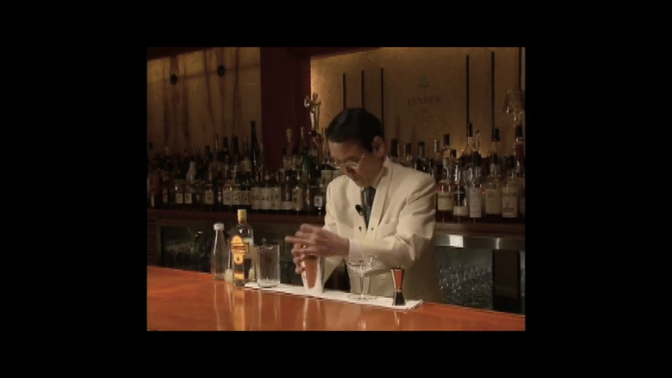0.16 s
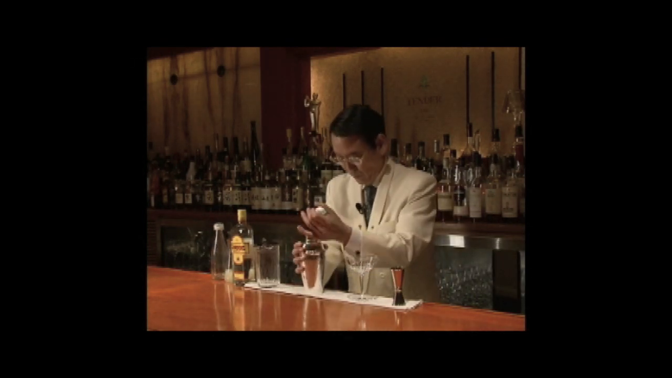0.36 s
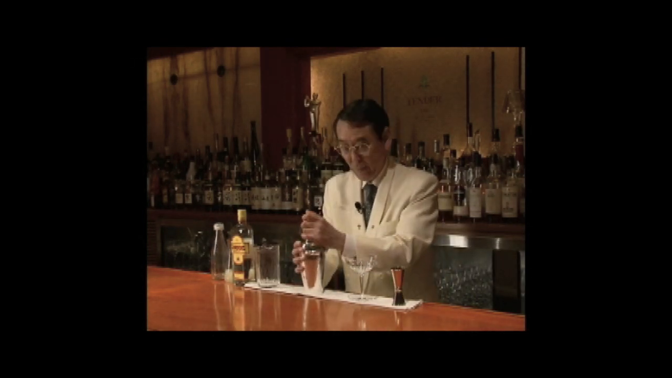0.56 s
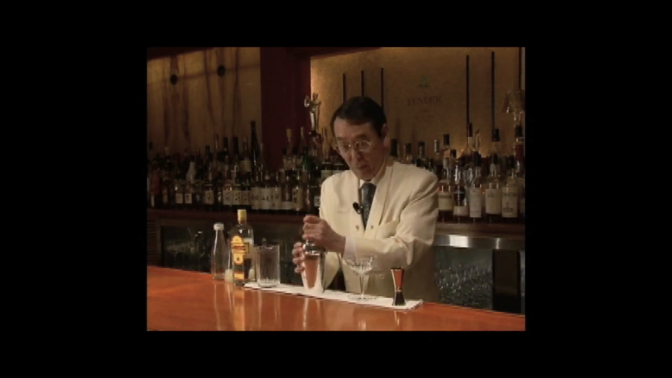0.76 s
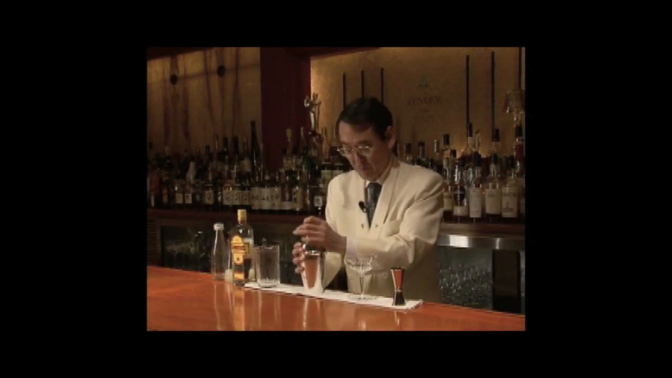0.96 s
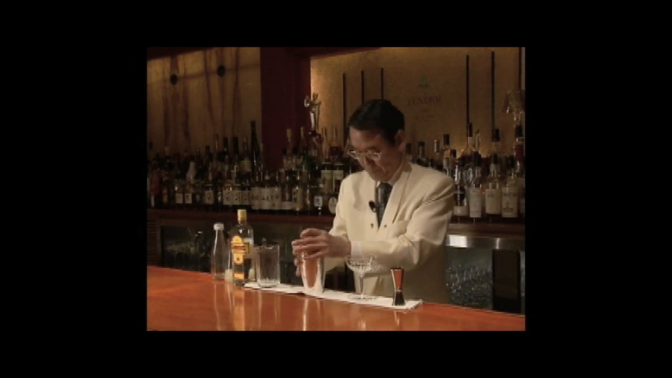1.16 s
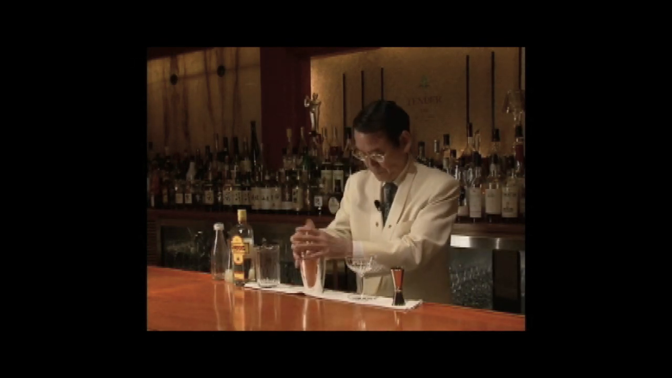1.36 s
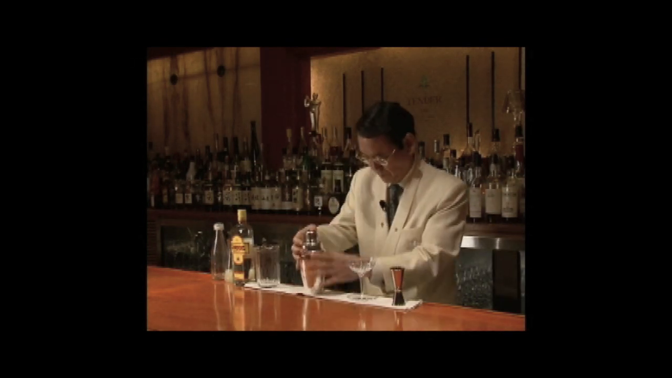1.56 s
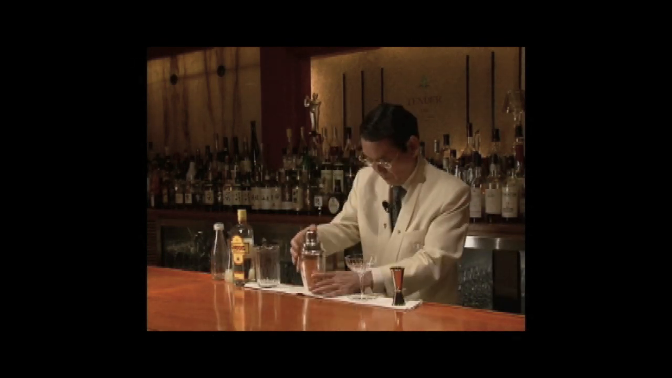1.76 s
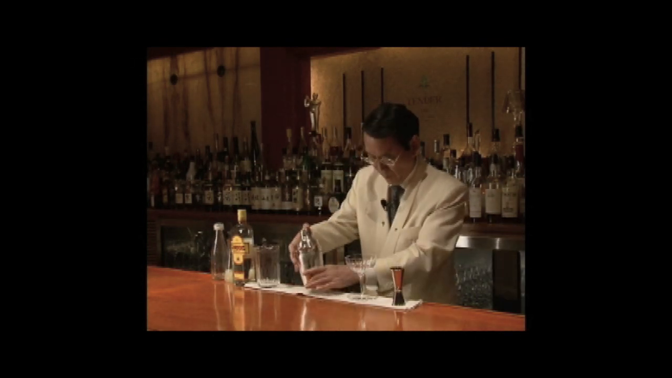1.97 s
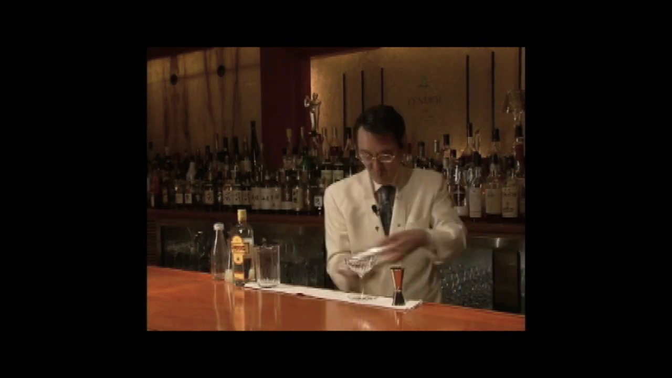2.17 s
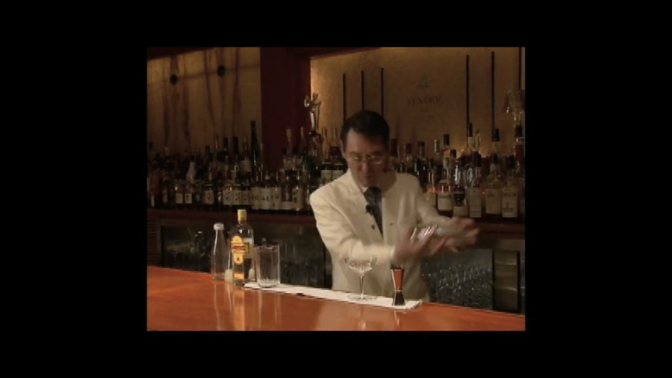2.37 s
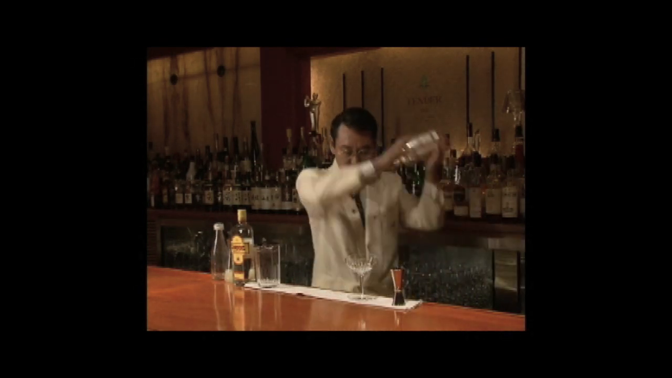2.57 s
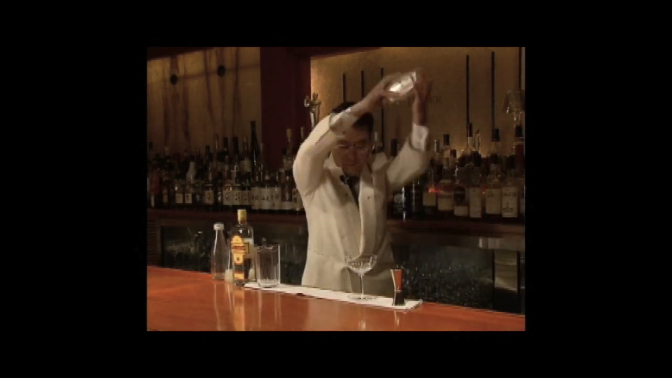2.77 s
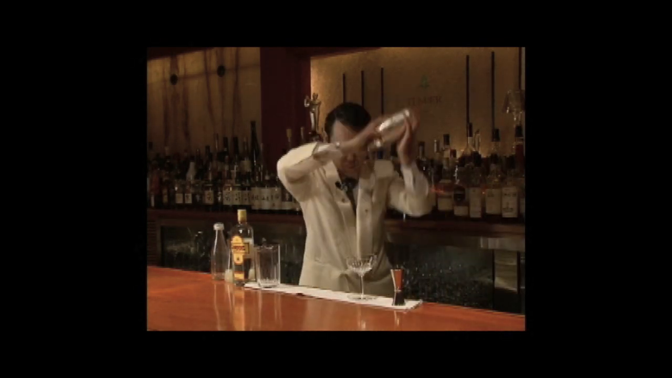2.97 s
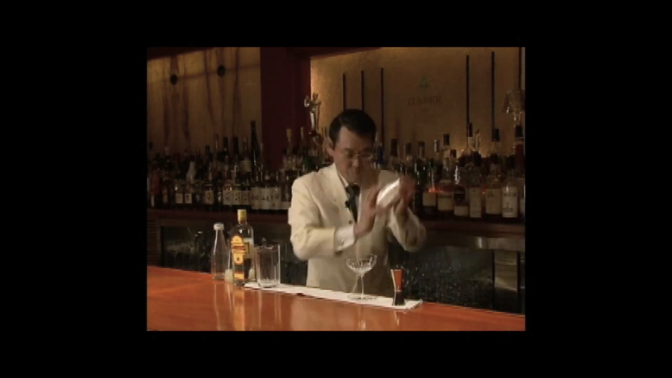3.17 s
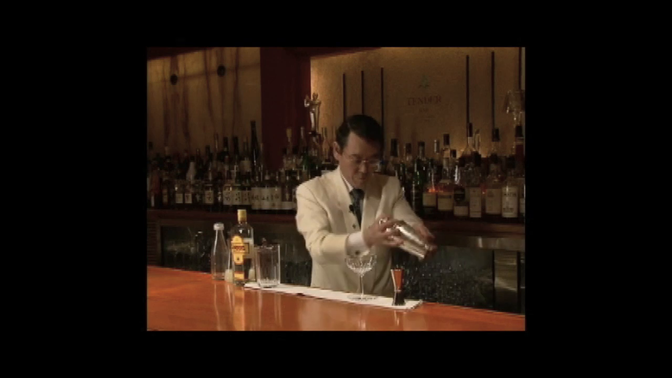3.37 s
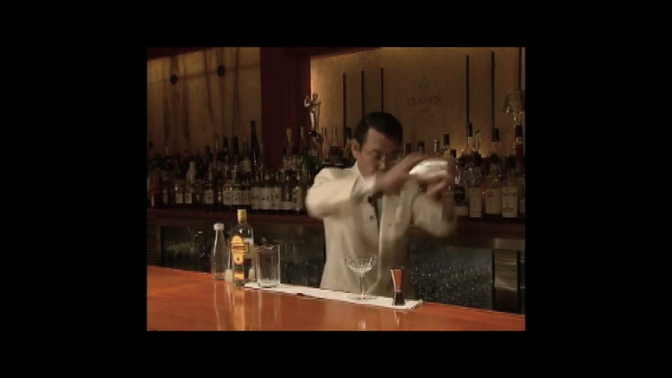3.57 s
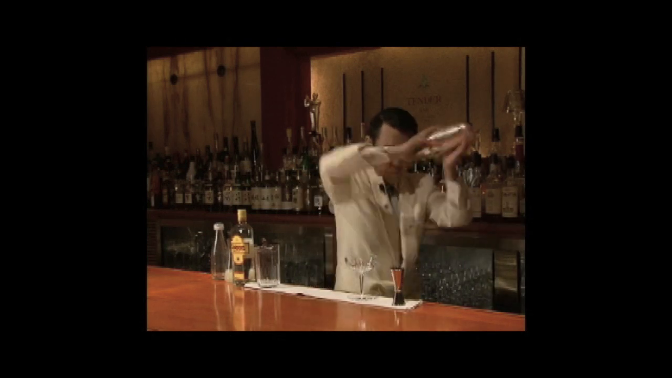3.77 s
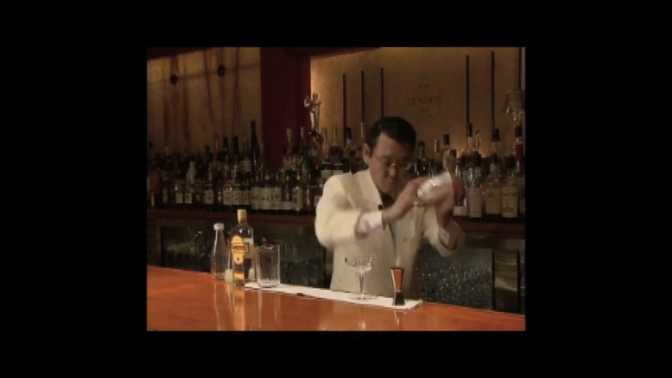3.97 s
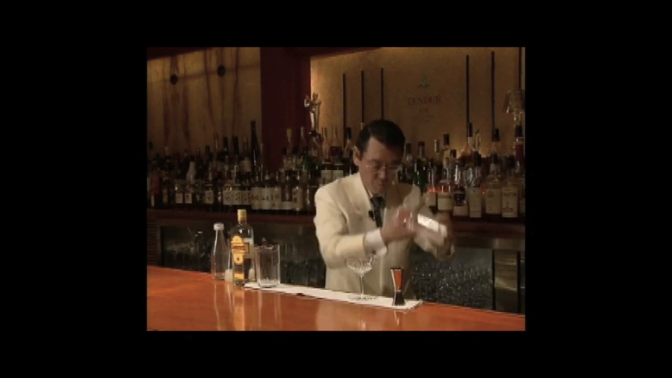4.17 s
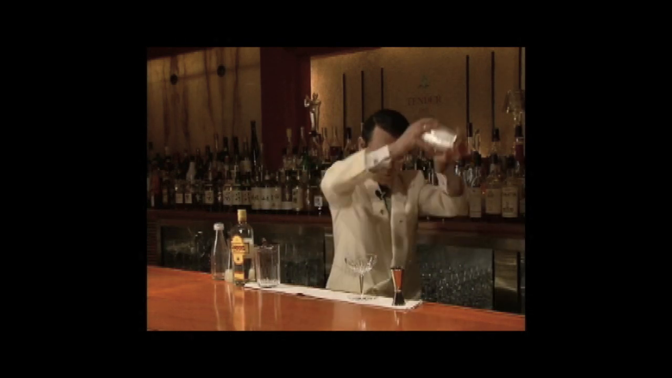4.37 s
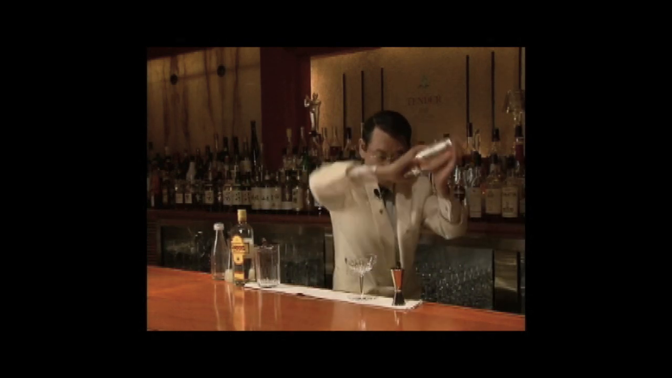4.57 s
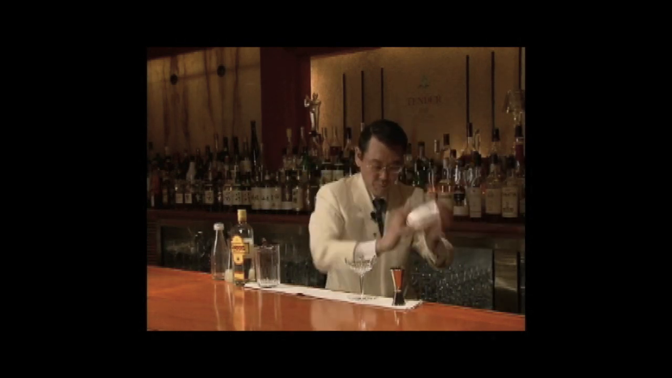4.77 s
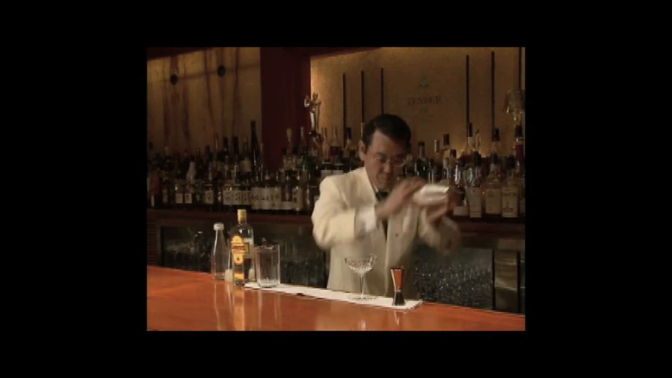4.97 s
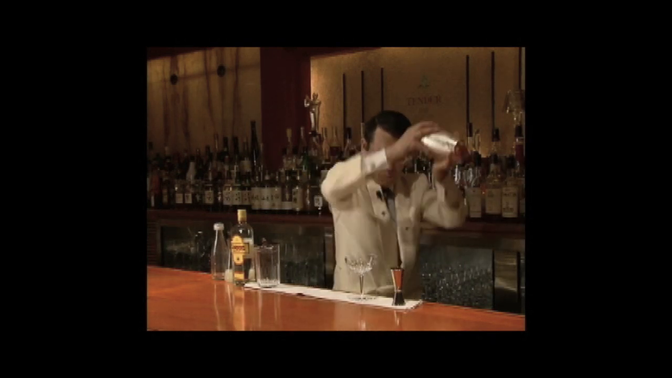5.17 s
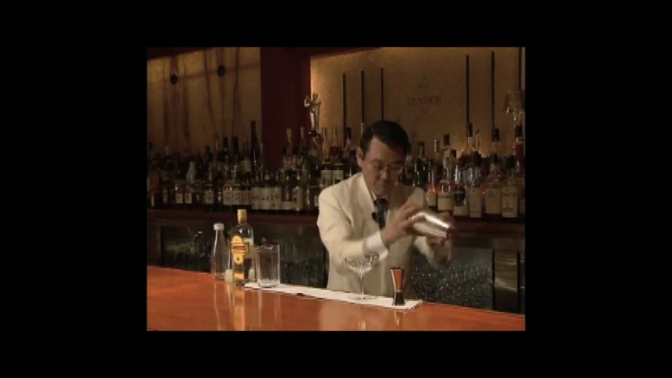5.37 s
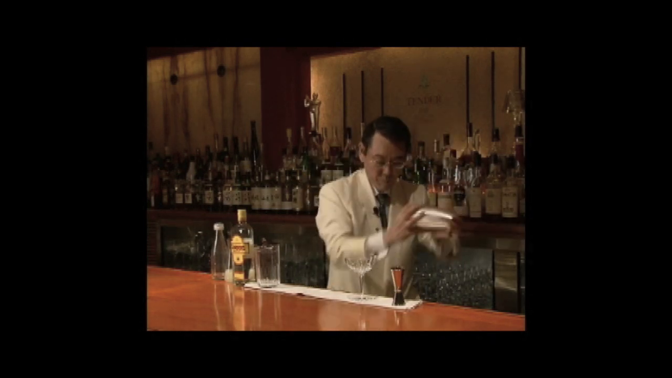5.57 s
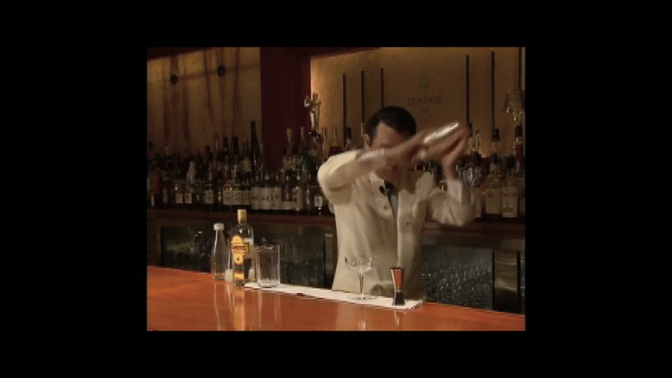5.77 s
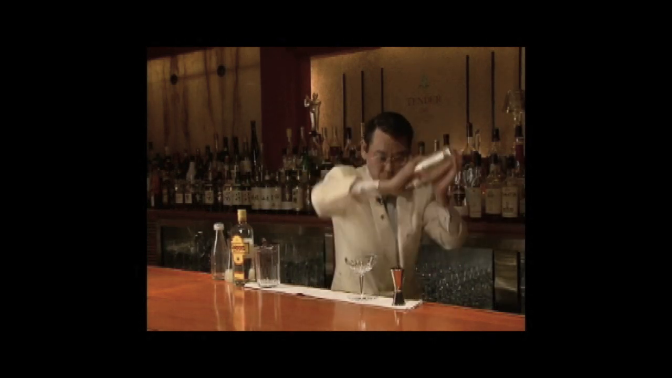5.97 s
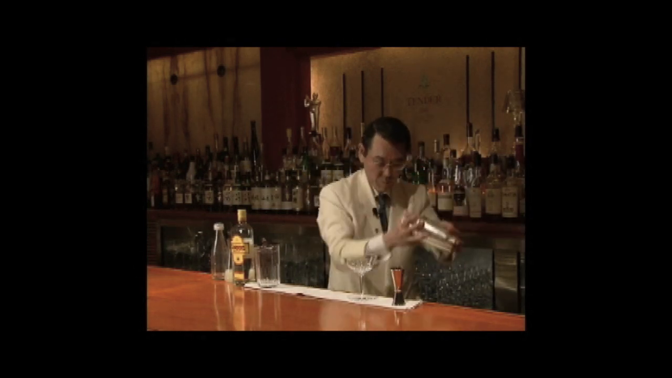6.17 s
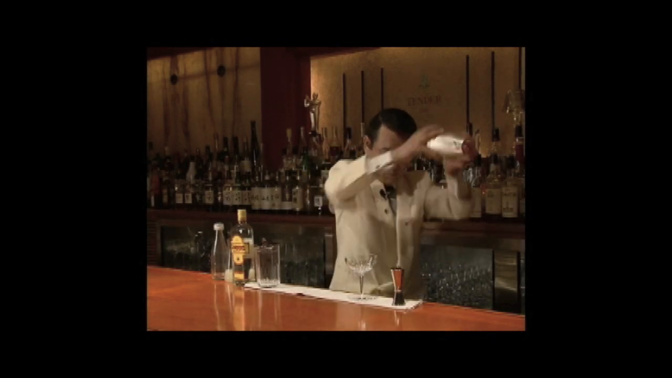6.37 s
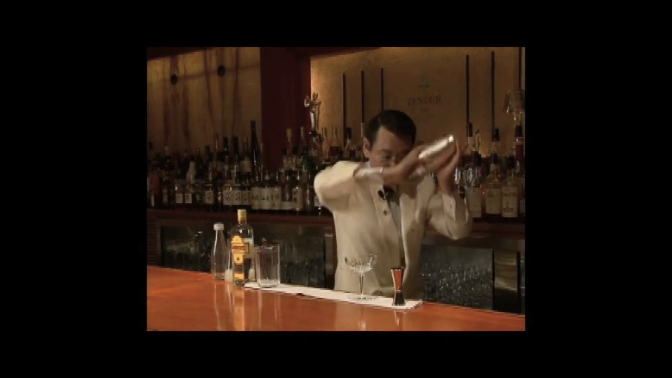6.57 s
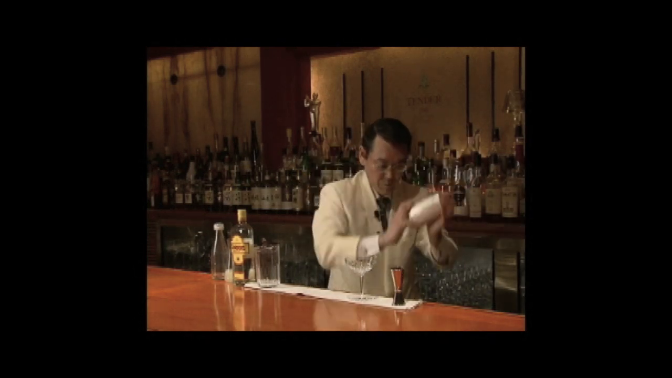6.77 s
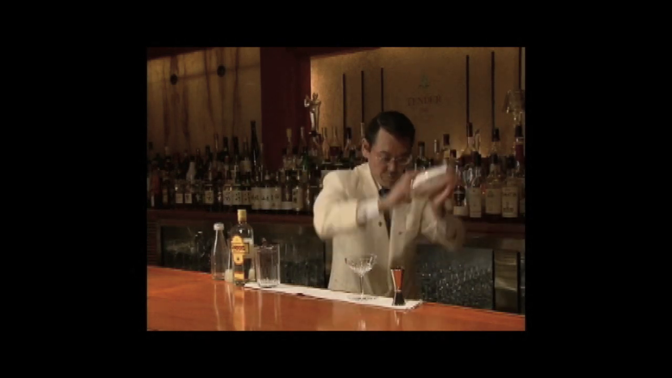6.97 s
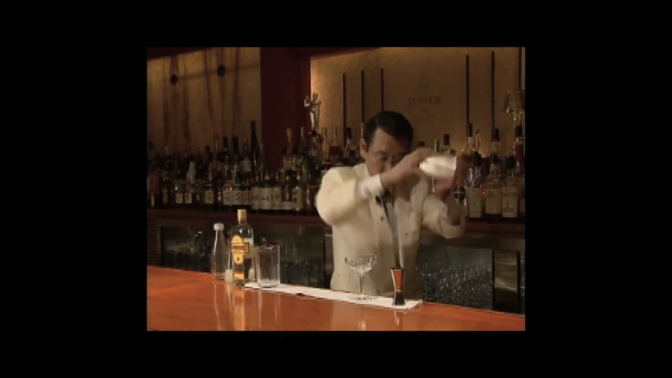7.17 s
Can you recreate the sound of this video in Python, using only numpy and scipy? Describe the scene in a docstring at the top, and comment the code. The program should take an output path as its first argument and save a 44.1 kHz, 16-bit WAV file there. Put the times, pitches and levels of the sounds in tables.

```python
"""A cooler hums under faint hiss in a quiet bar: wavering sines and shaped noise; sleeves rustle as shaped noise.
From 0.2 s a steel shaker is capped and tapped on a wooden counter: short rings of shell, lid, cap and wood.
From 2.2 s ice is shaken hard inside it, about nine strokes a second: big cubes ring the damped shell one by one,
while chips and drink rattle as a dense random train of small blows that swells and settles with each stroke.
Reflections follow the shaker, the sound has a slight random width, and gain control ducks it all on loud blows.
"""
import sys
import numpy as np
from scipy import signal
from scipy.fft import rfft, irfft, next_fast_len
from scipy.io import wavfile
from scipy.ndimage import uniform_filter1d

SR = 44100
rng = np.random.default_rng(int(sys.argv[2]) if len(sys.argv) > 2 else 0)


def to_wav(sig):
    """Store sig (one row per channel, or 1-D mono) as 16-bit WAV at the path in sys.argv[1].

    Samples outside -1..1 are clipped; the rate is SR.
    """
    pcm = np.clip(np.atleast_2d(sig), -1, 1) * 32767
    pcm = np.round(pcm).astype(np.int16)
    wavfile.write(sys.argv[1], SR, pcm.T)  # frames by channels


N = 318843  # length in samples


def amp(db):
    """Turns decibels into a plain gain."""
    return 10 ** (np.asarray(db) / 20)


def evened(x):
    """Scales a sound to an average (rms) level of 1."""
    return x / np.sqrt(np.mean(x ** 2) + 1e-20)


def noise():
    """Plain random hiss as long as the scene."""
    return rng.standard_normal(N)


def slow_noise(width):
    """Random wavering of rms 1: noise averaged twice over `width` samples."""
    return evened(uniform_filter1d(uniform_filter1d(noise(), width), width))


def add(mix, start_s, sound):
    """Mixes a sound in at its start time, cutting off what runs past the end."""
    part = mix[round(start_s * SR):][:len(sound)]
    part += sound[:len(part)]


def coloured(x, points):
    """Filters a sound by a curve of (pitch_hz, level_db) points."""
    size = next_fast_len(len(x))
    point_hz, point_db = np.transpose(points)
    hz = np.fft.rfftfreq(size, 1 / SR)
    gain = amp(np.interp(np.log(hz + 1), np.log(point_hz + 1), point_db))
    return irfft(rfft(x, size) * gain, size)[:len(x)]


def along(curve):
    """Gain through (time_s, level_db) points: near silence before the first, the last one held."""
    time_s, level_db = np.transpose(curve)
    return amp(np.interp(np.arange(N) / SR, time_s, level_db, left=-120, right=level_db[-1]))


# Spectrum of the hiss: pitch_hz, level_db
AIR_SPECTRUM = [(18, -39), (30, -23), (50, -11.5), (100, -11), (200, -5.5), (330, -7.5), (420, -4.5),
                (600, -8), (1200, -17.5), (1850, -24.5), (4400, -32.5), (6500, -30.5), (15500, -53)]


def ventilation():
    """Moving air: steady noise, strongest in the bass."""
    return amp(-47.5) * evened(coloured(noise(), AIR_SPECTRUM))


# Tones of the cooler: pitch_hz, level_db (rms, before wavering)
HUM_TONES = [(139.5, -63.5), (190, -57.5), (217, -59.5), (245.3, -52.5), (304, -71), (355, -62),
             (390, -55.5), (409, -60.5), (463.5, -61), (630, -65), (665, -64)]


def cooler():
    """A machine hum: steady pitches whose levels each waver slowly by about 1.1 dB."""
    t = np.arange(N) / SR
    hum = np.zeros(N)
    for pitch_hz, level_db in HUM_TONES:
        wavering = amp(level_db + 1.1 * slow_noise(3000))
        hum += np.sqrt(2) * wavering * np.sin(2 * np.pi * (pitch_hz * t + rng.random()))
    return hum


# Loudness of the sleeves: time_s, level_db
RUSTLE_LEVEL = [(0.0, -64), (0.3, -61.5), (0.8, -59.5), (1.16, -67), (1.45, -60), (1.7, -77), (1.92, -61.5),
                (2.2, -53)]
# Spectrum of rubbing cloth: pitch_hz, level_db
CLOTH_SPECTRUM = [(880, -35), (1500, -4), (2270, 0), (3370, -9), (3600, -7), (5840, -6), (15000, -24)]


def sleeves():
    """Rubbing cloth: shaped noise that follows the level points and stops at the last one."""
    moving = np.arange(N) / SR < RUSTLE_LEVEL[-1][0]
    return along(RUSTLE_LEVEL) * moving * evened(coloured(noise(), CLOTH_SPECTRUM))


def ring(modes, length_s):
    """A struck object: sines that die away, scaled to peak 1; t60 is the time to fall 60 dB."""
    t = np.arange(round(length_s * SR)) / SR
    sines = [amp(db - 60 * t / t60) * np.sin(2 * np.pi * hz * t) for hz, db, t60 in modes]
    x = sum(sines)
    return x / abs(x).max()


def shares(low_db, treble_db):
    """Gains of the low, middle and treble families; the middle takes what the treble leaves."""
    treble = np.clip(amp(treble_db), 0, .97)
    return np.array([amp(low_db), np.sqrt(1 - treble ** 2), treble])


# Rings of the shell held in both hands, before each blow varies them: pitch_hz, level_db, t60_s
# (8 low, 6 middle, then the treble)
SHELL_MODES = [(136, -17, 0.028), (213, -16, 0.028), (327, -9, 0.032), (502, -3.5, 0.021), (631, -3, 0.021),
               (785, 5, 0.012), (1056, -0.5, 0.014), (1352, -6.5, 0.021), (1655, 1, 0.0097),
               (2189, -1, 0.018), (2716, 0.5, 0.012), (3286, -1, 0.025), (3920, -1.5, 0.014),
               (4534, -2.5, 0.023), (5500, -8, 0.023), (6356, 0, 0.0045), (6830, -4.5, 0.023),
               (7367, -5.5, 0.019), (8530, -9.5, 0.017), (9810, -13.5, 0.026), (11400, -21, 0.017),
               (12460, -12, 0.0068), (14400, -38, 0.036), (15100, -24.5, 0.015)]


def strike(damping, rise_s, near_hz=None):
    """One blow, three families of peak 1: every mode is split in three, then detuned and reweighted at random."""
    hz, db, t60 = np.repeat(SHELL_MODES, 3, axis=0).T[:, :, None]
    families_at = [24, 42]  # where middle and treble begin
    middle = slice(*families_at)
    shift, weight, phase = rng.standard_normal((3, len(hz), 1))
    hz = hz * (1 + 0.0809 * shift)
    db = db + 4.44 * weight
    if near_hz:  # favour the middle modes close to the cube's own clack
        db[middle] -= np.minimum(70 * np.log(hz[middle] / near_hz) ** 2, 20)
    t = np.arange(1400) / SR
    modes = amp(db - 60 * t * damping / t60) * np.sin(2 * np.pi * hz * t + 3 * phase)
    modes *= 1 - np.exp(-t / (rise_s + 0.34 / hz))  # ice yields on contact; the bass swells more slowly
    families = np.array([part.sum(0) for part in np.split(modes, families_at)])
    return families / abs(families).max(axis=1, keepdims=True)


# Hands fitting the cap: start_s, tap_db, treble_db (share of the tap), lid_db, counter_db
HANDLING_TAPS = [(.234, -35, 0, -60, -60), (.282, -29.5, -6, -35, -54), (.306, -29, -5, -45, -37),
                 (.312, -19, -3, -45, -30), (0.317, -41, 0, -50, -52), (.767, -33.5, 3, -60, -60),
                 (1.064, -44, 0, -43, -33), (1.0868, -9.5, -1, -5.5, -31), (1.090, -11.5, -8, -28, -19.5),
                 (1.094, -17, -6, -17, -19.5), (1.163, -22, 1.5, -18, -39), (1.168, -22, 1, -18, -52),
                 (1.174, -20, -3, -10.5, -34), (1.19, -32, -5, -32, -42), (1.467, -36, -5, -51, -62),
                 (2.029, -43, 0, -60, -60), (2.133, -24, -3, -36, -39)]
# Rings of the lid: pitch_hz, level_db, t60_s
LID_MODES = [(1820, 1, 0.019), (2526, 4.5, 0.029), (4550, -8, 0.054), (7300, 1, 0.045), (7720, 1.5, 0.038),
             (11240, -0.5, 0.035)]
# Rings of the wooden counter: pitch_hz, level_db, t60_s
COUNTER_MODES = [(329, 6, 0.11), (353.6, 4, 0.22)]


def handling():
    """Taps on the closed shaker ring its shell and lid and thump the counter."""
    out = np.zeros(N)
    lid = ring(LID_MODES, .1)
    counter = ring(COUNTER_MODES, .1)
    for start_s, tap_db, treble_db, lid_db, counter_db in HANDLING_TAPS:
        blow = strike(damping=0.91, rise_s=0.00032)
        add(out, start_s, amp(tap_db) * shares(-29, treble_db) @ blow)
        add(out, start_s, amp(lid_db) * lid)
        add(out, start_s, amp(counter_db) * counter)
    return out


# Rings of the loose cap: pitch_hz, level_db, t60_s
CAP_MODES = [(7170, -5, 0.64), (7880, -2, 0.16), (10700, -8, 0.18), (11500, -7, .08), (4020, -4, 0.077),
             (2740, -6, .04)]


def loose_cap():
    """The flicked cap rings freely, then a finger stops it with a short fade."""
    out = np.zeros(N)
    cap = ring(CAP_MODES, length_s=0.234)
    samples_left = np.arange(len(cap))[::-1]
    add(out, .306, amp(-20) * cap * np.minimum(samples_left / 500, 1))
    return out


def chips(per_s, spread_db, count=90):
    """A dense random train of small blows, drawn from `count` kinds; one row per family, about rms 1."""
    kinds = [strike(damping=1.0, rise_s=0.00027) for _ in range(count)]
    when, size, kind = rng.random((40000, 3)).T
    times = np.cumsum(-np.log(when) / per_s)  # random waits between blows
    times = times[times < N / SR]
    levels_db = spread_db * np.minimum(-np.log(size), 4)  # a few blows are much louder
    rows = np.zeros((N, 3))
    for start_s, level_db, k in zip(times, levels_db, (kind * count).astype(int)):
        add(rows, start_s, amp(level_db) * kinds[k].T)
    return rows.T / rows.std(axis=0)[:, None]


# Load of ice landing at one end: crest_s, rattle_db, slosh_db (share of the low family), rise_s
ICE_STROKES = [(0.314, -41.5, -6.5, 0.022), (1.092, -27, -8, .009), (1.174, -29.5, -22, 0.015),
               (2.226, -13.5, -16.5, 0.0096), (2.302, -34.5, -11, 0.036), (2.371, -34, 0, 0.0068),
               (2.466, -20.5, -10.5, 0.011), (2.69, -24.5, -14.5, 0.012), (2.869, -18.5, -16.5, 0.0073),
               (3.045, -26, -9, 0.0088), (3.184, -19, -9.5, 0.0093), (3.344, -17.5, -9.5, 0.018),
               (3.451, -17, -9.5, 0.0096), (3.6, -19.5, -8, 0.033), (3.686, -19, -6.5, 0.013),
               (3.819, -22.5, -19, 0.016), (3.898, -17.5, -11.5, .01), (4.019, -14, -12.5, .01),
               (4.101, -19, -5.5, 0.012), (4.213, -18.5, -8.5, 0.018), (4.3, -20.5, -6.5, 0.0079),
               (4.42, -16, -8, 0.013), (4.511, -17.5, -9, 0.0047), (4.636, -16, -14, .012),
               (4.712, -19, -13.5, 0.016), (4.824, -19, -8, 0.022), (4.914, -20, -6, 0.015),
               (5.012, -18.5, -9.5, 0.013), (5.111, -21.5, -6, 0.0096), (5.23, -15, -23, 0.012),
               (5.311, -20.5, -10, 0.0049), (5.438, -16.5, -12.5, 0.021), (5.509, -19, -6, .0097),
               (5.612, -18, -9, 0.011), (5.704, -23.5, -2, 0.011), (5.85, -18, -16, 0.02),
               (5.92, -12.5, -10.5, .012), (6.05, -12, -14, 0.014), (6.119, -13.5, -9, 0.01),
               (6.225, -17.5, -11, 0.0083), (6.329, -17.5, -7, 0.0062), (6.46, -22, -10, 0.031),
               (6.545, -18.5, -12.5, 0.013), (6.658, -15, -17, 0.017), (6.735, -16.5, -7, .005),
               (6.849, -13.5, -12.5, 0.011), (6.938, -20.5, -8.5, 0.016), (7.069, -23.5, -7.5, 0.026),
               (7.155, -19, -8.5, 0.016)]
# Loose chips between strokes, before they clump: time_s, level_db
TUMBLE_LEVEL = [(2.15, -79), (2.2, -33.5), (2.38, -39), (2.73, -45), (2.98, -49.5), (3.38, -37),
                (4.03, -36.5), (4.82, -36.5), (5.5, -39), (6.22, -31.5), (6.71, -37.5), (7.23, -36.5)]


def rattle():
    """Each stroke piles chips and drink up at one end: the clatter swells to a crest and settles."""
    lumps = amp(3.5 * slow_noise(600))  # loose chips come in uneven clumps
    level = shares(-12.5, -5.0)[:, None] * along(TUMBLE_LEVEL) * lumps
    t = np.arange(-SR // 10, SR // 4) / SR  # seconds around the crest
    crests = np.array(ICE_STROKES)[:, 0]
    gaps_s = np.diff(crests, append=crests[-1] + 0.13)
    settle_s = np.clip(0.96 * gaps_s, .02, 0.19)  # a longer wait for the next stroke settles more slowly
    for (crest_s, rattle_db, slosh_db, rise_s), t60 in zip(ICE_STROKES, settle_s):
        swell = np.exp(-(np.minimum(t, 0) / -max(rise_s, .002)) ** 1.56)
        shape = amp(rattle_db - 60 * np.maximum(t, 0) / t60) * swell
        for row, share in zip(level, shares(slosh_db, treble_db=-2)):
            add(row, crest_s + t[0], share * shape)
    small_chips = chips(per_s=2200, spread_db=5.5)
    lesser_cubes = amp(-4.5) * chips(per_s=260, spread_db=3.5)
    return (level * (small_chips + lesser_cubes)).sum(0)


# Loudest cubes striking the shell: start_s, level_db, pitch_hz (of the clack), treble_db (share)
CUBE_KNOCKS = [(2.1842, -25, 1730, -5.5), (2.2089, -11, 1930, 0), (2.2243, -9, 1990, -1.5),
               (2.2354, -12, 2080, -3.5), (2.2432, -8, 2170, -2.5), (2.2641, -9.5, 2170, -3.5),
               (2.2987, -17, 2190, -5), (2.3675, -28, 4770, -2.5), (2.4124, -18.5, 3280, -2),
               (2.4628, -12, 1930, -3.5), (2.4985, -13, 2700, -1), (2.5116, -19, 2650, -2),
               (2.5985, -28.5, 1910, 0), (2.6636, -13.5, 3380, -1.5), (2.6884, -18, 4140, -1.5),
               (2.705, -15, 4240, -1.5), (2.8557, -14, 1600, -0.5), (2.8614, -9, 2080, -1),
               (2.87, -9, 4900, 0), (2.8764, -10, 2140, -1.5), (2.9168, -17.5, 2120, 0),
               (3.0333, -12.5, 4260, -2), (3.057, -15, 3180, -2), (3.1474, -26, 2620, -1),
               (3.1768, -3.5, 2150, -2), (3.316, -12, 2890, -1), (3.3282, -9, 3720, -1.5),
               (3.3433, -12.5, 3900, -5), (3.3604, -7.5, 3370, -4), (3.4421, -13.5, 2270, -2.5),
               (3.451, -11, 2100, -2.5), (3.4807, -13.5, 2210, -2.5), (3.542, -9.5, 3260, -3),
               (3.562, -4.5, 4900, -2), (3.578, -6, 3500, -2.5), (3.5987, -5.5, 2960, -3.5),
               (3.6716, -7, 2560, -4), (3.682, -4.5, 3070, -3), (3.7439, -18, 3740, -4),
               (3.7929, -10.5, 4720, -3.5), (3.8124, -6.5, 3870, -3), (3.828, -6.5, 2600, -2.5),
               (3.8782, -10, 2230, -5.5), (3.8876, -7, 2240, -4.5), (3.897, -9, 2160, -8),
               (3.9913, -10.5, 3570, -2.5), (4.0074, -9, 3500, 0), (4.0178, -1, 3180, 0),
               (4.0954, -10, 4750, 0), (4.185, -10.5, 2420, -0.5), (4.2028, -11, 2970, -2.5),
               (4.2104, -13, 3200, 1), (4.296, -8.5, 2050, -1.5), (4.3743, -11, 3130, -4.5),
               (4.387, -12.5, 3340, -5), (4.4014, -14, 3110, -3), (4.415, -10, 3600, -4),
               (4.4314, -6, 3360, -1.5), (4.5062, -12, 3700, -6), (4.5188, -11.5, 3010, -4),
               (4.595, -6, 4870, -1.5), (4.6169, -9, 2830, -3), (4.6324, -9, 3700, -1),
               (4.689, -12, 3170, -2.5), (4.706, -11, 2950, 0), (4.713, -6, 2120, -0.5),
               (4.7795, -15, 2940, -2.5), (4.793, -7.5, 3280, -1.5), (4.81, -8.5, 3940, -1),
               (4.8246, -6, 3500, 0), (4.9008, -9.5, 4790, -1.5), (4.9194, -9, 2970, 0),
               (4.999, -10, 4100, -0.5), (5.0154, -12, 3090, 0), (5.0274, -9.5, 3310, -2),
               (5.1038, -14.5, 3200, -3.5), (5.2051, -14, 3260, -1), (5.2187, -5.5, 3300, -5),
               (5.2277, -5, 2780, -4), (5.2428, -7.5, 3370, -5), (5.3041, -6.5, 2060, -2),
               (5.323, -11, 2090, 0), (5.4124, -11, 3360, -0.5), (5.4324, -6, 3540, -3),
               (5.4977, -13, 2000, -5), (5.5528, -18, 4120, -1), (5.578, -15, 4280, -2),
               (5.5915, -10.5, 2620, -0.5), (5.6096, -13, 3180, -1), (5.6274, -8.5, 3470, -2),
               (5.6722, -14, 3690, -1.5), (5.681, -12, 4560, -1.5), (5.6989, -9.5, 2450, -1.5),
               (5.708, -13, 4820, 1), (5.7388, -23, 3700, -1), (5.7982, -17, 3110, -2.5),
               (5.8027, -15, 3280, -2.5), (5.8264, -8.5, 3950, -3), (5.8371, -12, 3940, 0),
               (5.8486, -6.5, 4400, -5), (5.911, -0.5, 2510, -5), (5.9143, -11, 3400, -7),
               (5.9494, -18, 3400, 0), (6.002, -11.5, 3750, -2.5), (6.0104, -16, 3300, -4),
               (6.0216, -9.5, 3300, 0), (6.0278, -5, 3220, -1), (6.0404, -7, 2810, -1),
               (6.0457, -2.5, 3100, -1), (6.114, -7, 2370, -1), (6.1184, -10, 4370, -0.5),
               (6.1957, -14.5, 3340, -2), (6.218, -6, 4500, -2), (6.2244, -14, 3520, -1),
               (6.2327, -3, 2950, -1), (6.2532, -3.5, 3010, 0), (6.324, -11, 2540, -3),
               (6.344, -19, 4900, -1.5), (6.414, -12, 3470, -4), (6.4258, -10.5, 4360, -2),
               (6.4488, -14, 3620, -6), (6.4594, -11, 3040, -4), (6.5193, -12, 2220, -1.5),
               (6.534, -8, 3230, -4), (6.5414, -7, 1940, -1.5), (6.554, -9, 3450, -1),
               (6.634, -14, 3430, -5), (6.6456, -10, 2640, -7), (6.6528, -10, 3040, -5),
               (6.7316, -12.5, 3510, 0.5), (6.804, -17.5, 3630, -0.5), (6.8394, -10, 2810, -2.5),
               (6.8546, -5.5, 3020, -0.5), (6.9303, -9.5, 1930, -2), (6.9454, -12.5, 2730, 0),
               (7.0292, -13, 3300, -4.5), (7.0452, -5.5, 3630, -1), (7.0663, -6.5, 4580, -1),
               (7.1413, -11, 4750, -0.5), (7.161, -8, 2200, -1.5)]


def cubes():
    """The largest single blows of ice ring the steel; each cube adds a brief clack at its own pitch."""
    out = np.zeros(N)
    for start_s, level_db, pitch_hz, treble_db in CUBE_KNOCKS:
        blow = strike(damping=0.64, rise_s=0.00033, near_hz=pitch_hz)
        add(out, start_s, amp(level_db) * shares(-15, treble_db) @ blow)
        clack = ring([(pitch_hz, 0, 0.039)], length_s=.05)
        middle_share = shares(0, treble_db)[1]
        add(out, start_s, amp(level_db - 9) * middle_share * clack)
    return out


def room(x, t60, start_s):
    """Sparse reflections of random sign, dying away; total energy 1."""
    taps = np.zeros(SR // 3)
    at = np.arange(round(start_s * SR), len(taps) - 20, 20)
    taps[at + rng.integers(0, 20, len(at))] = rng.choice([-1., 1.], len(at))
    taps *= amp(-60 * np.arange(len(taps)) / SR / t60)
    return signal.oaconvolve(x, taps / np.linalg.norm(taps))[:N]


# Amount of random width at each pitch: pitch_hz, level_db
WIDTH_SPECTRUM = [(30, -30), (180, -46), (550, -56), (1400, -73), (3000, -47), (6000, -27), (10000, -12),
                  (15000, -4)]


def scene():
    """Nearly mono: a slight random width, mostly in the treble."""
    bar = ventilation() + cooler() + sleeves()
    shaker = handling() + loose_cap() + rattle() + cubes()
    mid = bar + shaker + amp(-14.0) * room(shaker, t60=0.24, start_s=.004)
    side = slow_noise(150) * coloured(mid, WIDTH_SPECTRUM)
    return np.array([mid + side, mid - side])


def record(dry):
    """Gain control falls quickly on blows and then recovers; then peaks are rounded and the top is cut."""
    power_db = 10 * np.log10(abs(uniform_filter1d((dry ** 2).mean(0), 900)) + 1e-12)
    power_db[0] = -22.5  # the gain starts lowered and recovers
    fall = np.arange(N) * 17.7 / SR  # the held level sinks 17.7 dB per second
    held_db = np.maximum.accumulate(power_db + fall) - fall
    over_db = np.maximum(held_db + 39.0, 0)  # excess above -39 dB
    ducked = dry / amp(0.23 * uniform_filter1d(over_db, 400))
    rounded = 0.65 * np.tanh(ducked / 0.62)  # the input stage rounds off the tallest peaks
    low_pass = signal.firwin(511, 16000, window=("kaiser", 9), fs=SR)  # cutoff in Hz
    return signal.oaconvolve(rounded, low_pass[None], "same")


dry = scene()
out = record(dry)
to_wav(out)
```